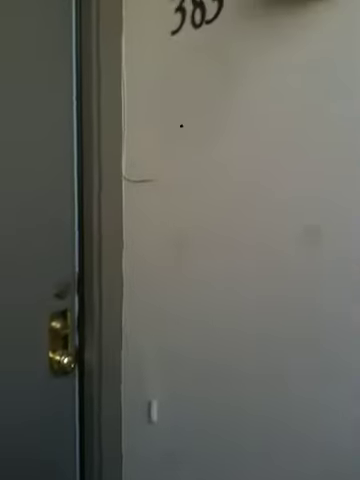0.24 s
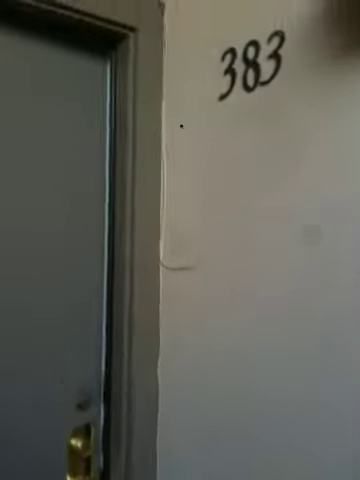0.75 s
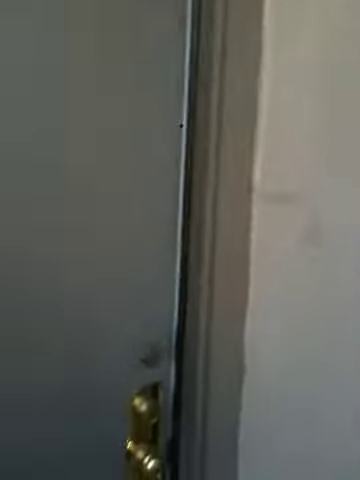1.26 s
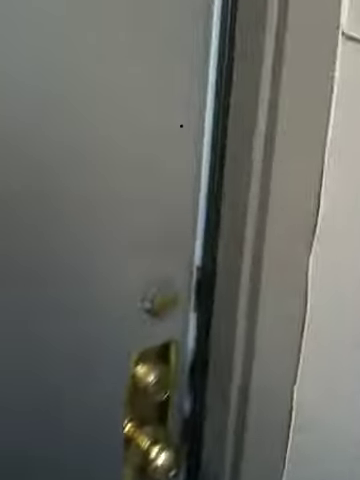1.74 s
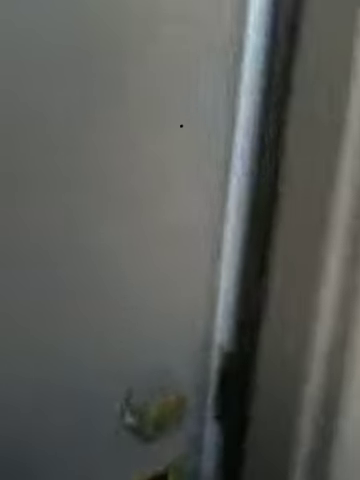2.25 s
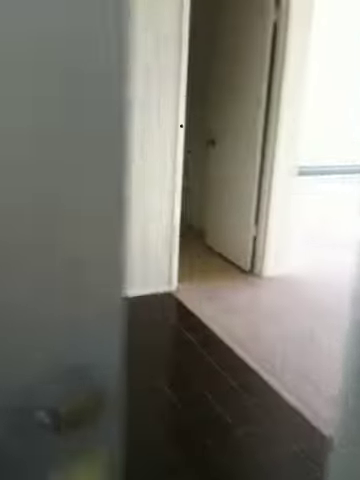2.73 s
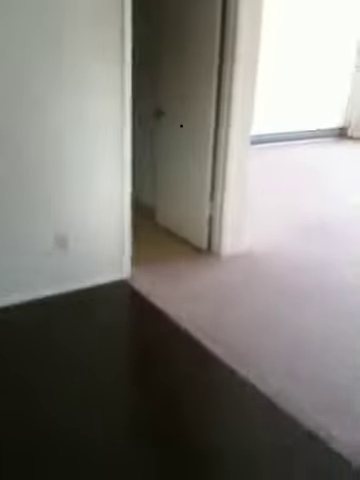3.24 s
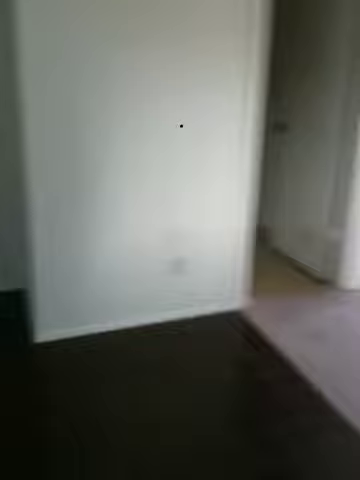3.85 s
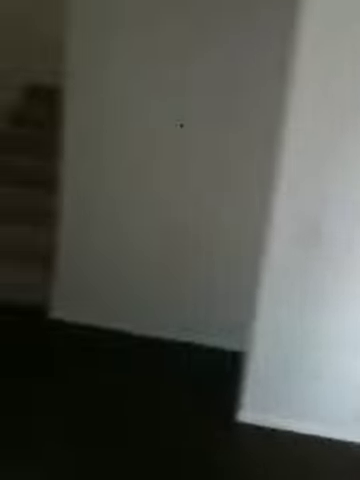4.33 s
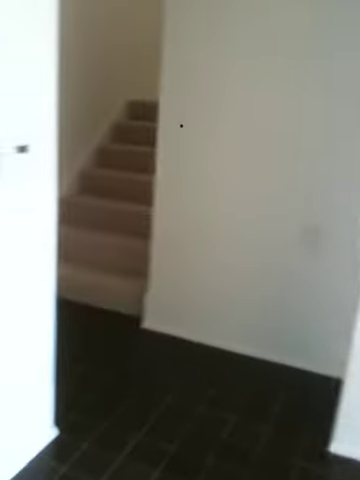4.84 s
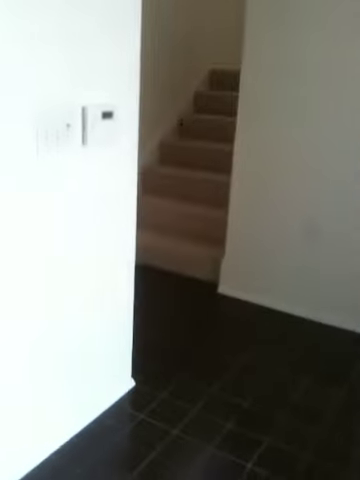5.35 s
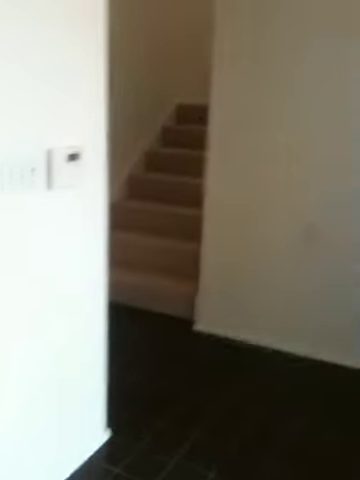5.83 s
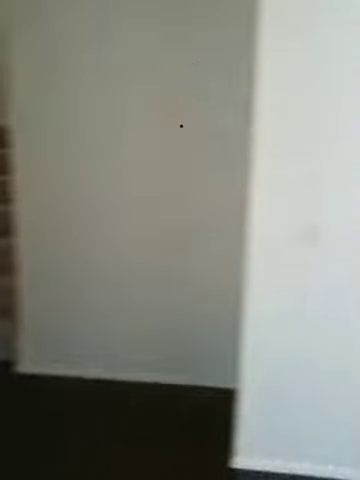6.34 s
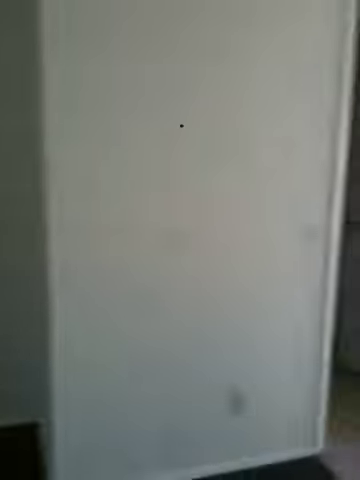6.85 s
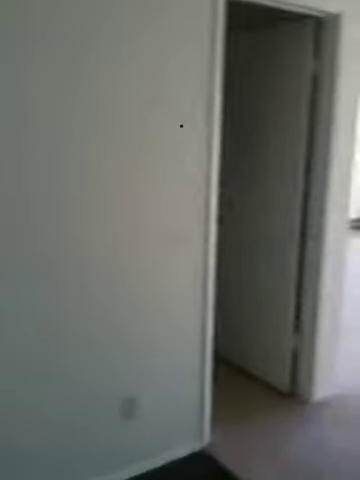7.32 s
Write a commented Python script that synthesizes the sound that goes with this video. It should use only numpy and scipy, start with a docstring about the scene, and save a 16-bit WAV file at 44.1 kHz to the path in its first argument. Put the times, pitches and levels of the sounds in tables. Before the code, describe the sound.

A faint outdoor murmur and a short shoe squeak come first, then dry metallic key touches, lock clacks and scrapes. A brighter jingle comes as the door opens, followed by hand bumps and light steps indoors. The door then bangs shut, by far the loudest event, with bare walls answering. Afterwards the air is quieter, with sparse key clicks and scuffs. Small handheld microphone, thin in deep bass.

```python
"""Coming home with keys

Someone with a bunch of keys in hand opens a front door and walks into an empty, hard-floored flat.
Keys click and ring, parts clack, shoes scuff and squeak, and the hand bumps the microphone: noise bursts
and dying tones. Outdoor murmur and rustling clothes are shaped noise; a faint far whine is a climbing tone.
Then the door swings shut: the latch meets the strike plate, squeaks across it in short gliding tones,
and the leaf bangs into the frame with thuds, rattles and its own ring. Bare walls answer."""
import sys
import numpy as np
from scipy import signal
from scipy.fft import irfft
from scipy.io import wavfile
from scipy.ndimage import uniform_filter1d

SR = 44100
rng = np.random.default_rng(int(sys.argv[2]) if len(sys.argv) > 2 else 0)


def transcribe(u):
    """Save the signal u as a 16-bit wav file named by the first command-line argument.

    u: samples, shape (n,) or (channels, n), limited to [-1, 1]; the rate is SR.
    q: integer samples, one column per channel.
    """
    v = np.clip(np.atleast_2d(u).T, -1, 1)
    q = np.round(v * 32767).astype(np.int16)
    wavfile.write(sys.argv[1], SR, q)


N = 334277
TIME = np.arange(N) / SR  # seconds

# how the murmur of air and distant traffic is spread over pitch: (f/Hz, level/dB)
AIR_COLOUR = [(15, -78), (25, -38.5), (117, -9), (145, -5.5), (180, -1), (223, -3), (285, -4), (427, -8.5),
              (476, -5.5), (714, -7.5), (1400, -10.5), (2000, -8.5), (2910, -18.5), (12500, -32),
              (16000, -31)]
# how the rustle of clothes is spread over pitch: (f/Hz, level/dB)
RUSTLE_COLOUR = [(500, -19.5), (2000, 1.5), (4000, 0), (7000, -1), (11000, -3), (16000, -11)]
# how loud the clothes rustle, before the flutter: (t/s, level/dB)
RUSTLE_LEVEL = [(0, -75.5), (1, -75.5), (1.55, -67.5), (2.4, -66), (2.7, -76.5), (3.05, -64.5),
                (3.7, -73.5), (4.2, -68.5), (4.55, -74.5), (5.15, -66.5), (5.65, -70.5), (6.3, -63),
                (7.15, -73), (7.58, -71)]
# how long the bare room takes to fade by 60 dB: (f/Hz, t60/s)
ROOM_FADE = [(60, 0.414), (200, 0.71), (500, 0.55), (1200, 0.66), (2500, 0.53), (3600, 0.69), (5500, 0.53),
             (14000, 0.59)]
# bumps of the hand and footfalls: (t/s, level/dB)
BUMPS = [(2.242, -55), (2.736, -62.5), (3.99, -60), (4.284, -60), (4.37, -59), (4.796, -60), (5.186, -60),
         (5.24, -60)]
# colour of a bump: (f/Hz, level/dB)
BUMP_COLOUR = [(25, -21), (60, -16), (110, 4.5), (190, 3.5), (300, -25), (1000, -34)]
# clacks of lock, handle and door, the first row a tick of the shoe as it squeaks: (t/s, level/dB, resonance of
# the part f/Hz)
CLACKS = [(.326, -53, 900), (1.47, -39, 1220), (1.588, -53.5, 2600), (1.992, -48, 2290), (2.308, -42, 3930),
          (3.160, -40.5, 534)]
# shoes on the hard floor: (t/s, level/dB, resonance f/Hz)
STEPS = [(3.881, -45, 1940), (4.620, -56.5, 1000), (5.015, -55, 900), (6.549, -53, 810),
         (6.657, -59.5, 1900), (6.73, -54, 469), (7.445, -63, 900)]
# scrapes of a key or a sole: (t/s, level/dB, tilt/dB per octave, resonance f/Hz)
SCRAPES = [(.913, -55.5, 7.5, 5330), (1.435, -49.5, 9.5, 5000), (2.075, -47.5, 3, 990),
           (2.228, -53.5, -0.5, 2302), (2.381, -51, 12, 3830), (6.897, -53, 7.5, 1786)]
# colour shared by clacks, steps, scrapes and the shoe scuff: (f/Hz, level/dB)
CLACK_COLOUR = [(60, -29), (200, -5), (450, -0.5), (750, -6), (1150, -1.5), (2200, -2), (3200, -11.5),
                (6000, -16.5), (11000, -25.5), (16000, -30.5)]
# the clearest touches of the keys: (t/s, click level/dB, click tilt/dB per octave, looseness 0-1)
CLINKS = [(1.14, -51, 2, 0.59), (1.245, -51, 3, 0.42), (1.428, -48, 2, .25), (1.437, -41, 11, 0.13),
          (1.69, -43, 4, 0.2), (2.021, -45.5, -4, 0.37), (2.239, -46.5, -5.5, .38), (2.439, -58.5, 6, 0.58),
          (2.547, -49.5, -4, .22), (2.730, -41, 2.5, 0.15), (2.787, -54, 5, 0.65), (2.8502, -44, -3, .15),
          (2.8725, -31, 0, .45), (2.898, -43.5, 0, .05), (3.009, -53, 10, 0.5), (3.145, -50.5, 16, 0.58),
          (3.180, -41.5, 9, .05), (3.427, -49.5, -6, 0.99), (3.439, -36.5, -2, .3), (3.579, -59, -2, 0.6),
          (4.045, -49, 3.5, 0.2), (5.045, -53, 15, 0.36), (5.741, -49.5, 0.5, .3), (6.289, -32.5, 3, 0),
          (6.307, -38.5, -2, 0), (6.498, -49, 0, .2), (7.548, -46, 3.5, .05)]
# colour of metal meeting metal: (f/Hz, level/dB)
CLICK_COLOUR = [(300, -31.5), (1500, -7), (3000, -9), (4800, 2), (7000, -3.5), (10500, 2), (13000, -6.5),
                (16000, -15.5)]
# ringing tones of the keys, before each touch changes them: (f/Hz, level/dB, fully loose t60/s)
KEY_MODES = [(4700, -20, .2), (4810, -18, .3), (4880, -20, .2), (5356, -21, .35), (7325, -2, .19),
             (7385, -8, .08), (9243, -13, .08), (11010, -15, .1), (11970, -9, .06), (12390, -3, .11),
             (12870, -7, .07), (12915, -2.5, .16)]
# moments when the steel hoop holding the keys swings free and sings: (t/s, level/dB)
HOOP_KNOCKS = [(2.873, -57.5), (3.145, -65), (3.428, -59)]
# ringing tone of that hoop: (f/Hz, level/dB, t60/s)
HOOP_MODES = [(4610, -2.5, 1.03)]
# the latch slipping over the strike plate: (t/s, length/s, first f/Hz, last f/Hz, level/dB)
SLIPS = [(5.9892, 0.0097, 3106, 3770, -17.5), (5.9977, 0.0035, 3420, 3400, -12.5),
         (6.001, 0.0049, 3700, 3620, -20.5), (6.003, 0.013, 3403, 3340, -24.5),
         (6.012, .022, 3590, 3795, -20.5)]
# blows on the door: (t/s, thud level/dB, level/dB of rattling fittings, level/dB of the ringing leaf)
BLOWS = [(1.471, -53, -51, -77), (3.161, -43, -50.5, -51.5), (5.9361, -40.5, -27, -46.5),
         (5.941, -45, -23.5, -64.5), (6.001, -20.5, -27, -23), (6.012, -22.5, -20, -38),
         (6.027, -28.5, -23, -49.5), (6.040, -23, -29.5, -45.5), (6.078, -31, -26.5, -41)]
# colour of the thud: (f/Hz, level/dB)
THUD_COLOUR = [(25, -39.5), (55, -34.5), (75, -33), (115, -19.5), (150, -3.5), (190, 1), (240, 0.5),
               (290, -8), (380, -7.5), (600, -15), (1000, -21.5), (3000, -49.5)]
# colour of the rattling fittings: (f/Hz, level/dB)
RATTLE_COLOUR = [(50, -40), (120, -18.5), (300, -8), (500, 3), (750, -6), (1050, -6.5), (1900, 0.5),
                 (2900, -5), (4500, -8), (8000, -12), (11000, -20), (15500, -30)]
# ringing tones of the door leaf: (f/Hz, level/dB, t60/s)
DOOR_MODES = [(153.5, 1.5, 0.38), (183.7, -1.5, 0.39), (220, -14, 1), (240, -3, 0.46), (330, -9, 0.55),
              (358.6, -6.5, 0.52), (426.9, -5.5, 0.67), (505, -14.5, .8), (733, -10, 0.46)]

# the murmur is loudest on the doorstep and drops in two stages: (from s, to s, change dB)
OUTDOOR_DB = -62
STEPPING_IN, DOOR_CLOSING = (3.44, 3.69, -1.7), (5.28, 5.92, -6.5)
FLUTTER_DB = 1.4  # typical wobble of the rustle
# a faint far whine climbs steadily until the door shuts it out
WHINE_HZ, WHINE_CLIMB_HZ_PER_S, WHINE_DB = 497, 26.5, -73
WHINE_START_S, WHINE_END_S, WHINE_FADE_S = 0.58, 6.0, 0.48
SQUEAK_START_S, SQUEAK_LENGTH_S = .262, .15
SQUEAK_HZ, SQUEAK_DB, SQUEAK_SCUFF_DB = 1753, -60.5, -62
SQUEAK_PARTIALS_DB, SQUEAK_ROUGH = (-3.5, -2, 0.5), .045  # roughness is the typical pitch error, as a share
PART_HZ, PART_T60_S, PART_RISE_S = 1300, 0.072, 0.0014  # a middling part
# smaller parts are brighter (dB per octave, per octave of resonance) and die sooner (exponent)
PART_TILT_DB, PART_DAMPING = 2.5, 0.49
STEP_RISE_S, STEP_T60_S = 0.0042, .12
SCRAPE_RISE_S, SCRAPE_T60_S = .015, 0.14
# looser keys ring more; at EVEN_LOOSENESS ring and click get the same gain
RING_RANGE_DB, EVEN_LOOSENESS = 35, 0.56
JOSTLE_SPAN_S, JOSTLES_PER_S = (1.1, 6), 3  # faint chance touches while the bunch is carried
JOSTLE_DB, JOSTLE_TILT_DB, JOSTLE_LOOSENESS = -59.5, -2, .4
BASS_CUT_HZ, TREBLE_CUT_HZ = 55.5, 15900


def amp(db):
    """Turns decibels into a gain."""
    return 10 ** (np.asarray(db) / 20)


def evened(x):
    """Scales a sound to an average strength (rms) of 1."""
    return x / np.sqrt(np.mean(x ** 2) + 1e-20)


def read(points, hz):
    """Reads between the rows of a table, with pitch spaced by ratio as the ear hears it."""
    f, value = np.transpose(points)
    return np.interp(np.log(hz + 1), np.log(f + 1), value)


def add(mix, s, sound):
    """Mixes a sound in at time s."""
    part = mix[max(round(s * SR), 0):][:len(sound)]
    part += sound[:len(part)]


def ramp(start, end):
    """Rises from 0 to 1 between two times."""
    return np.clip((TIME - start) / (end - start), 0, 1)


def noise(colour, size, tilt_db=0):
    """Makes noise of rms 1 with a given colour, tilted by some dB per octave."""
    hz = np.fft.rfftfreq(size, 1 / SR)
    gain = amp(read(colour, hz) + tilt_db * np.log2(hz + 200))  # the 200 eases the tilt in the bass
    random_phases = np.exp(2j * np.pi * rng.random(len(hz)))
    return evened(irfft(gain * random_phases, size))


def burst(colour, rise, t60, tilt_db=0):
    """A contact: many crowded tones, heard as noise, that swell and die together."""
    t = TIME[:16384]
    rise = max(rise, 1 / SR)
    swell = np.minimum(t / rise, 1)
    fall = np.exp(-np.log(1000) * np.maximum(t - rise, 0) / t60)
    return noise(colour, len(t), tilt_db) * swell * fall


def ring(modes, looseness=1):
    """Separate dying tones of a struck object; held tight, it dies sooner."""
    t = TIME[:SR + SR // 2]
    out = np.zeros(len(t))
    for hz, db, t60 in modes:
        fall = np.exp(-np.log(1000) * t / (t60 * looseness))
        out += amp(db) * fall * np.sin(2 * np.pi * hz * t)
    return out


def room(x, wet_db, build_s):
    """Adds the tail of bare walls: sparse reflections that build up, each band dying at its own speed."""
    is_echo = rng.random(SR) < 1 / 10
    build_up = np.minimum(TIME[:SR] / build_s, 1)
    taps = rng.choice([-1., 1.], SR) * is_echo * build_up
    hz, t, bands = signal.stft(taps, SR, nperseg=256)
    fall = np.exp(-np.log(1000) * t / read(ROOM_FADE, hz)[:, None])
    tail = signal.istft(bands * fall, SR, nperseg=256)[1]
    return x + amp(wet_db) * signal.fftconvolve(x, tail / np.linalg.norm(tail))[:N]


def background():
    """Outdoor air, which fades indoors and again as the door shuts, and the uneven rustle of clothes."""
    air_db = OUTDOOR_DB + sum(db * ramp(start, end) for start, end, db in (STEPPING_IN, DOOR_CLOSING))
    flutter = uniform_filter1d(rng.standard_normal(N), size=900)
    flutter = evened(uniform_filter1d(flutter, size=500))
    rustle_db = np.interp(TIME, *np.transpose(RUSTLE_LEVEL)) + FLUTTER_DB * flutter
    return noise(AIR_COLOUR, N) * amp(air_db) + noise(RUSTLE_COLOUR, N) * amp(rustle_db)


def whine():
    """A thin, slightly unsteady climbing tone with a weaker octave above it."""
    waver = evened(uniform_filter1d(rng.standard_normal(N), size=3000))
    hz = (WHINE_HZ + WHINE_CLIMB_HZ_PER_S * TIME) * (1 + .007 * waver)
    phase = 2 * np.pi * np.cumsum(hz) / SR
    fade_in = ramp(WHINE_START_S, WHINE_START_S + WHINE_FADE_S)
    fade_out = ramp(WHINE_END_S - WHINE_FADE_S, WHINE_END_S)
    return amp(WHINE_DB) * (fade_in - fade_out) * (np.sin(phase) + amp(-3.5) * np.sin(2 * phase))


def bumps():
    """Soft low pushes that reach the microphone through the hand."""
    out = np.zeros(N)
    for s, db in BUMPS:
        # start a little early, so the push is nearly full at the listed time
        add(out, s - .008, amp(db) * burst(BUMP_COLOUR, rise=0.0093, t60=0.14))
    return out


def squeak():
    """Rubber sticks and slips unevenly: three blurred partials and a scuff swell and fade together."""
    out, count = np.zeros(N), round(SQUEAK_LENGTH_S * SR)
    jitter = evened(uniform_filter1d(rng.standard_normal(count), size=30))
    phase = 2 * np.pi * np.cumsum(SQUEAK_HZ * (1 + SQUEAK_ROUGH * jitter)) / SR
    tone = sum(amp(db) * np.sin(k * phase) for k, db in enumerate(SQUEAK_PARTIALS_DB, 1))
    scuff = noise(CLACK_COLOUR, count, tilt_db=3)
    rub = amp(SQUEAK_DB) * evened(tone) + amp(SQUEAK_SCUFF_DB) * scuff
    add(out, SQUEAK_START_S, rub * signal.windows.hann(count))
    return room(out, wet_db=-6.5, build_s=.006)


def part_colour(resonance_hz):
    """Colour of a struck or rubbed part: the shared clack colour with one broad resonance."""
    grid_hz = np.geomspace(50, 16000, 120)
    octaves_away = np.log2(grid_hz / resonance_hz)
    return np.c_[grid_hz, read(CLACK_COLOUR, grid_hz) + 7 * np.exp(-(octaves_away / 0.25) ** 2)]


def contacts():
    """Duller contacts: quick clacks, softer steps and slow scrapes, each a noise burst in the room."""
    out = np.zeros(N)
    for s, db, hz in CLACKS:
        t60 = PART_T60_S * (PART_HZ / hz) ** PART_DAMPING
        tilt_db = PART_TILT_DB * np.log2(hz / PART_HZ)
        add(out, s, amp(db) * burst(part_colour(hz), PART_RISE_S, t60, tilt_db))
    for s, db, hz in STEPS:
        tilt_db = PART_TILT_DB * np.log2(hz / PART_HZ)
        add(out, s, amp(db) * burst(part_colour(hz), STEP_RISE_S, STEP_T60_S, tilt_db))
    for s, db, tilt_db, hz in SCRAPES:
        add(out, s, amp(db) * burst(part_colour(hz), SCRAPE_RISE_S, SCRAPE_T60_S, tilt_db))
    return room(out, wet_db=-5.0, build_s=0.0057)


def jostles():
    """Faint touches at random moments, as rows like those of CLINKS."""
    start, end = JOSTLE_SPAN_S
    moments = rng.uniform(start, end, size=round(JOSTLES_PER_S * (end - start)))
    return [(s, JOSTLE_DB, JOSTLE_TILT_DB, JOSTLE_LOOSENESS) for s in moments]


def touched_modes(looseness):
    """Each contact loads the keys differently, so every tone shifts a little in pitch and strength."""
    modes = []
    for hz, db, t60 in KEY_MODES:
        shifted_hz = hz * (1 + .002 * rng.standard_normal() / looseness ** 2)
        shifted_db = db + 2.5 * rng.standard_normal()
        # pressure mutes the low tones first
        shifted_db += 14 * (1 - looseness) * np.log2(shifted_hz / 13000)
        modes.append((shifted_hz, shifted_db, t60))
    return modes


def keys():
    """A sharp click of its own colour, then chatter; loose keys ring longer than keys pressed together."""
    clicks, rings = np.zeros(N), np.zeros(N)
    grid_hz = np.linspace(200, 16000, 36)
    for s, click_db, tilt_db, looseness in CLINKS + jostles():
        uneven_db = 3.5 * rng.standard_normal(len(grid_hz))
        colour = np.c_[grid_hz, read(CLICK_COLOUR, grid_hz) + uneven_db]
        add(clicks, s, amp(click_db) * burst(colour, rise=0.00064, t60=0.024, tilt_db=tilt_db))
        for delay in rng.uniform(0.0018, 0.024, size=3):  # later rebounds are weaker
            rebound_db = click_db - 8 - 350 * delay
            add(clicks, s + delay, amp(rebound_db) * burst(colour, rise=.0005, t60=.03, tilt_db=tilt_db))
        ring_db = click_db + RING_RANGE_DB * (looseness - EVEN_LOOSENESS)
        looseness = np.clip(looseness, .25, 1)
        add(rings, s, amp(ring_db) * ring(touched_modes(looseness), looseness))
    out = room(clicks, wet_db=-10.5, build_s=.006) + rings
    out += amp(-17) * room(rings, wet_db=0, build_s=.01)
    for s, db in HOOP_KNOCKS:
        add(out, s, amp(db) * ring(HOOP_MODES))
    return out


def latch():
    """The latch sticks and slips: short gliding squeals with weak overtones."""
    out = np.zeros(N)
    for s, length, first_hz, last_hz, db in SLIPS:
        count = max(round(length * SR), 2)
        phase = 2 * np.pi * np.cumsum(np.linspace(first_hz, last_hz, count)) / SR
        squeal = np.sin(phase) + amp(-24.0) * np.sin(2 * phase) + amp(-21) * np.sin(3 * phase)
        add(out, s, amp(db) * squeal * signal.windows.tukey(count, .5))
    return out


def door():
    """Every blow thuds, rattles the fittings and rings the leaf; the empty room answers loudly."""
    contact, leaf = latch(), np.zeros(N)
    leaf_ring = ring(DOOR_MODES)
    leaf_ring *= 1 - np.exp(-TIME[:len(leaf_ring)] / 0.017)  # the leaf's ring swells up over a moment
    for s, thud_db, rattle_db, ring_db in BLOWS:
        add(contact, s, amp(thud_db) * burst(THUD_COLOUR, rise=0.0028, t60=0.074))
        add(contact, s, amp(rattle_db) * burst(RATTLE_COLOUR, rise=0.00097, t60=0.09))
        add(leaf, s, amp(ring_db) * leaf_ring)
    return room(contact, wet_db=-2.5, build_s=0.0061) + leaf


def scene():
    """Adds up all sources at one microphone."""
    return (background() + whine() + bumps() + squeak() + contacts() + keys() + door())[None]


def record(dry):
    """The small microphone sheds deep bass; then a steep filter cuts the highest treble."""
    bass_cut = signal.butter(3, BASS_CUT_HZ, "high", fs=SR, output="sos")
    thin = signal.sosfilt(bass_cut, dry)
    treble_cut = signal.firwin(511, TREBLE_CUT_HZ, window=("kaiser", 9), fs=SR)
    return signal.oaconvolve(thin, treble_cut[None], "same", axes=1)


dry = scene()
out = record(dry)
transcribe(out)
```